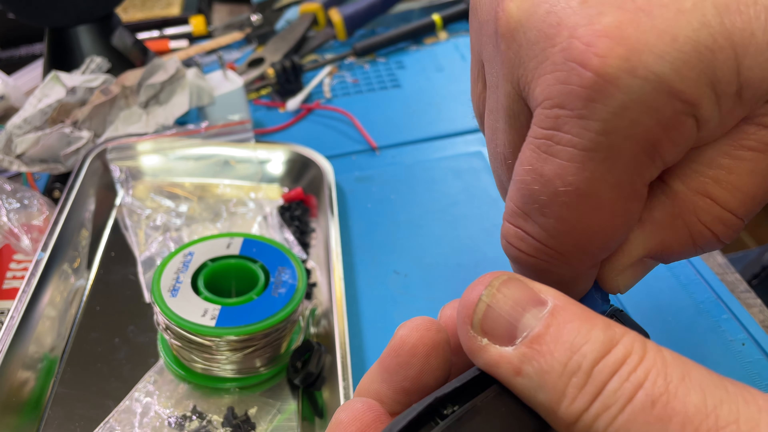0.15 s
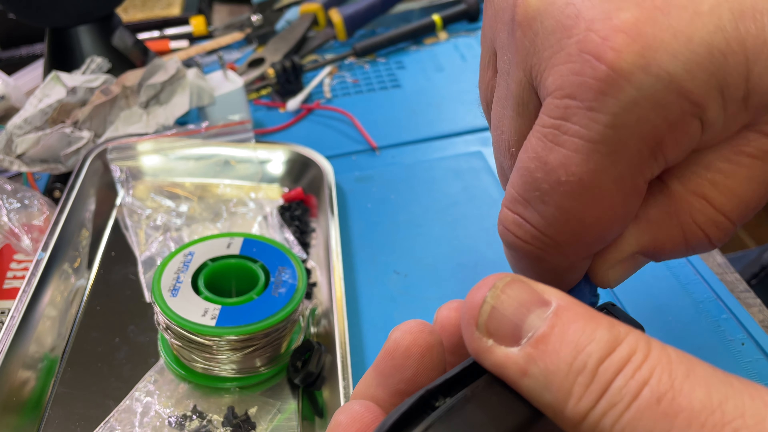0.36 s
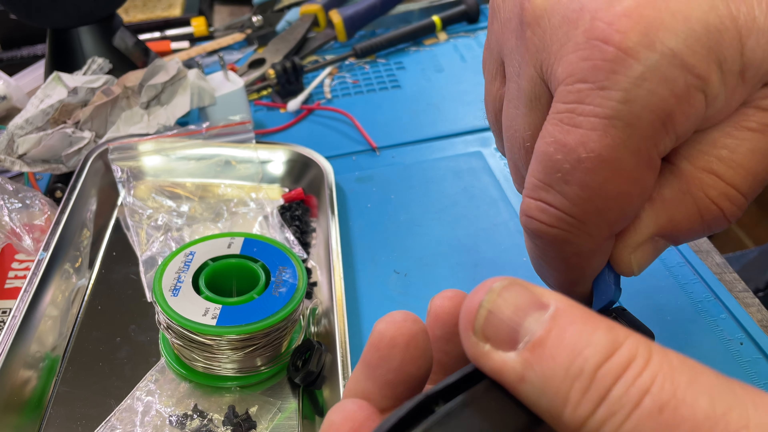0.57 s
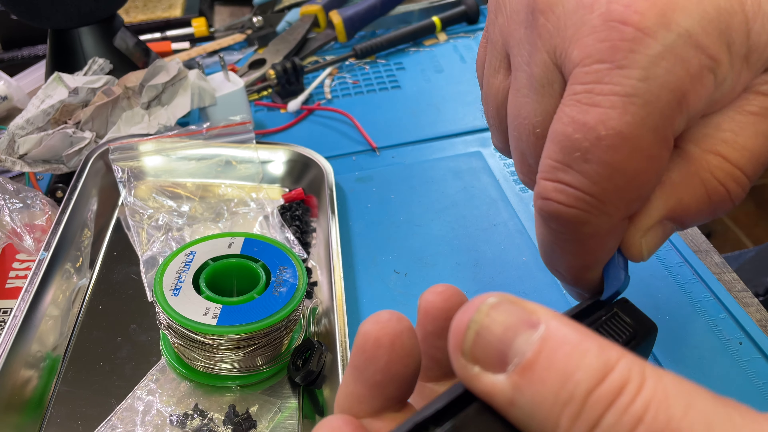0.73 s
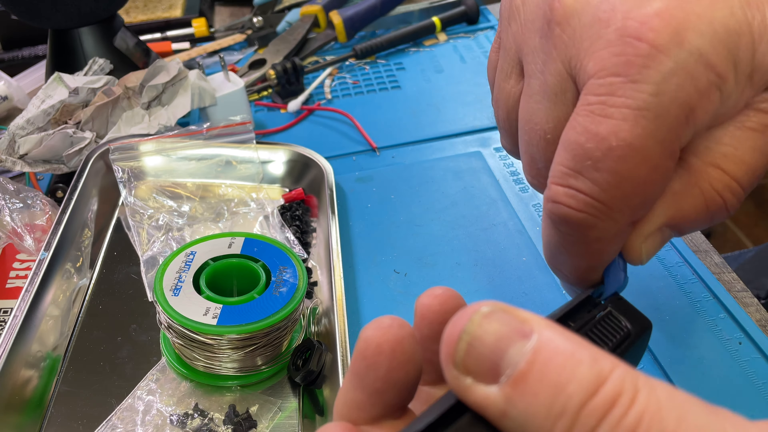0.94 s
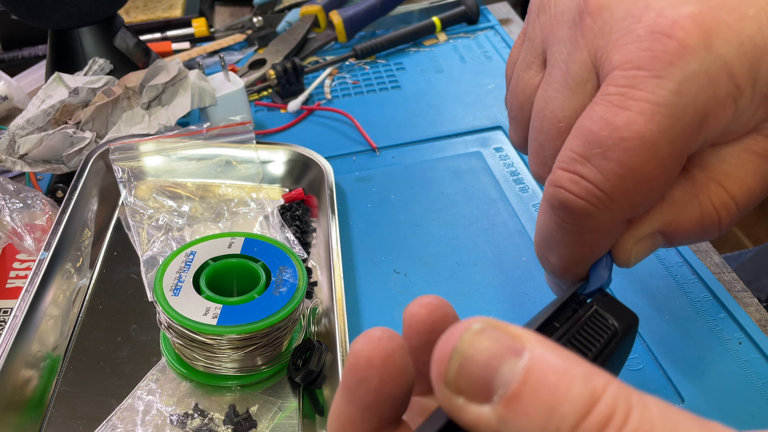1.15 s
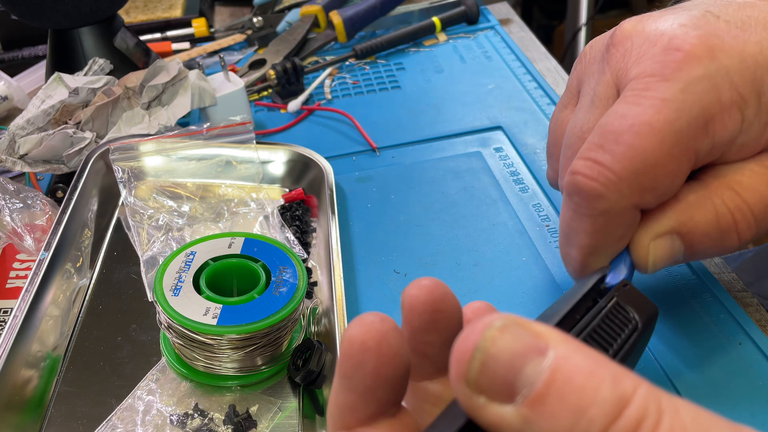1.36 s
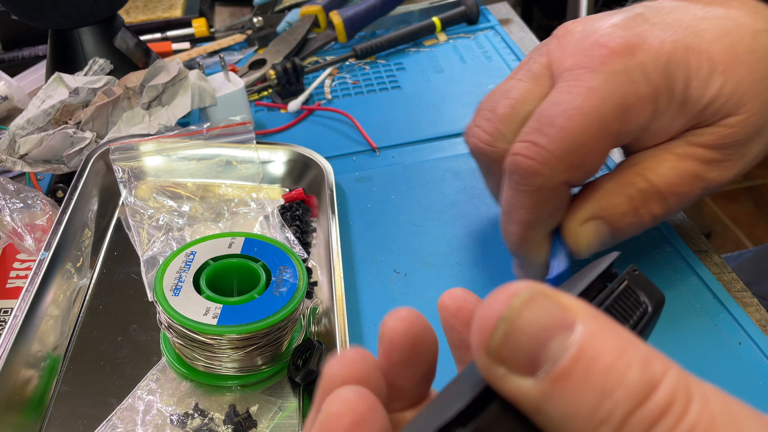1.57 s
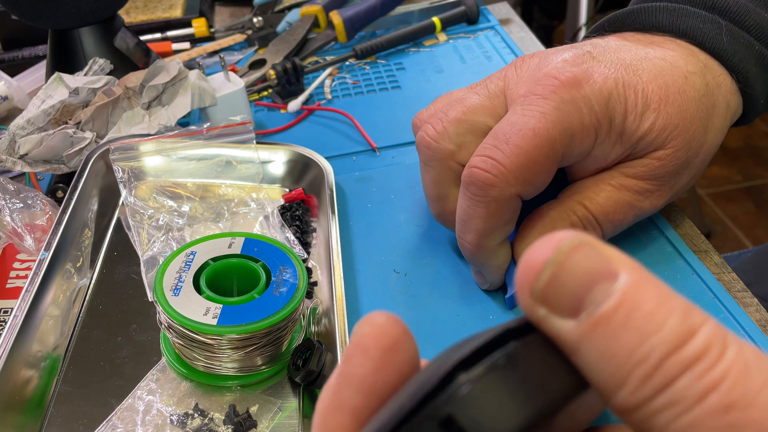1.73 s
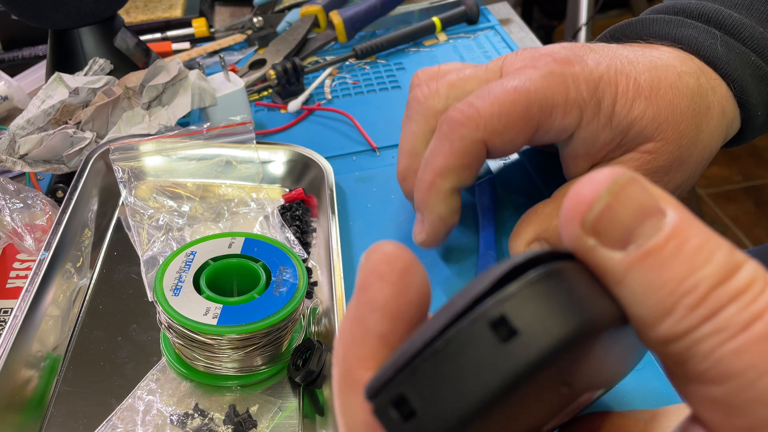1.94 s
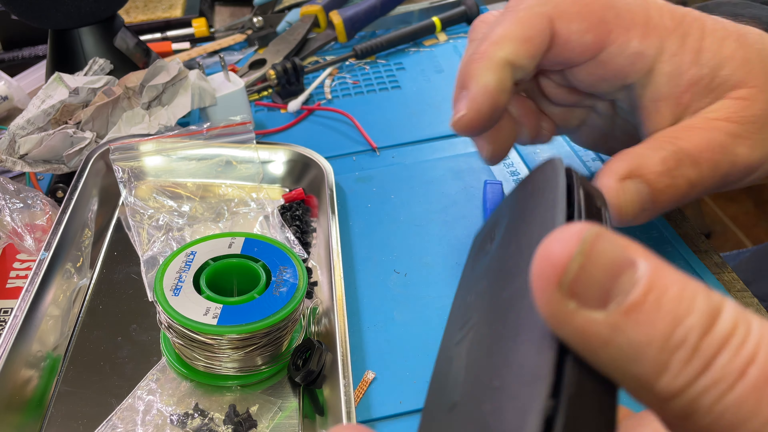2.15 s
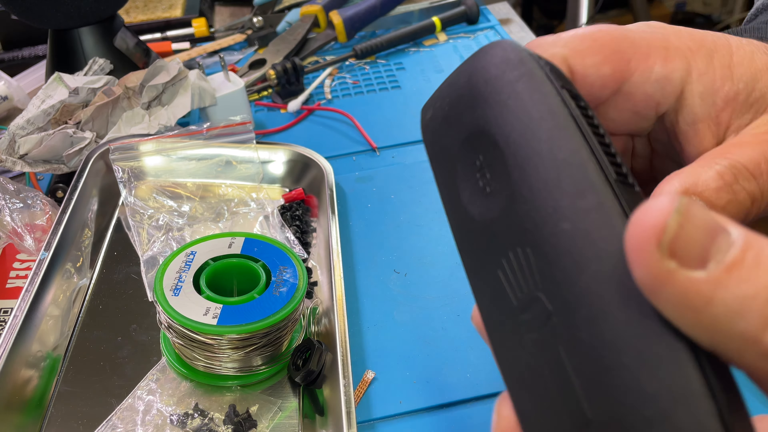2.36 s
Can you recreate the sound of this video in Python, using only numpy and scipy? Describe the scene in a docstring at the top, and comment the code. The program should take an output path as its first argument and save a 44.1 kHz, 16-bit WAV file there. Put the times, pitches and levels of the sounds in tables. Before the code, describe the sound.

Prying open a plastic case: one sharp snap, smaller clicks and scrapes, then dull handling knocks

```python
"""A low handling rumble over faint hiss comes first, then a soft scrape and one loud snap as a clip lets go.
Place: a workbench, a flashlight case opened with a plastic pry tool, close to a two-port microphone.
The tool scrapes, clicks and squeaks along the seam, the freed case knocks dully, and fingers rub over it.
Blows ring damped modes, friction is coloured noise gated by stick-slip, and faint hollow tones are
wavering sines; snap, clicks, cracks and knocks also get short reflections from bench and room."""
import sys
import numpy as np
from scipy import signal
from scipy.fft import rfft, irfft
from scipy.io import wavfile

SR = 44100
rng = np.random.default_rng(int(sys.argv[2]) if len(sys.argv) > 2 else 0)


def wav_record(signal):
    """Record a signal, one row per channel, as 16-bit PCM in the file named by sys.argv[1]."""
    frames = np.transpose(np.atleast_2d(signal))
    bounded = np.clip(frames, -1, 1)
    # unit amplitude maps onto the largest positive 16-bit level
    quanta = np.round(bounded * 32767).astype(np.int16)
    wavfile.write(sys.argv[1], SR, quanta)


N = 105840  # samples, 2.4 s
TREBLE_HZ = 3020  # where friction is split into mids and treble


def amp(db):
    """Decibels to gain."""
    return 10 ** (np.asarray(db) / 20)


def evened(x):
    """Scales to rms 1."""
    return x / np.sqrt(np.mean(x ** 2) + 1e-20)


def read(points, hz):
    """Reads a table on a log-frequency axis."""
    f, value = np.transpose(points)
    return np.interp(np.log(hz + 1), np.log(f + 1), value)


def seconds(count=N):
    """Time axis."""
    return np.arange(count) / SR


def add(mix, s, sound):
    """Mixes a sound in at a time."""
    part = mix[round(s * SR):][:len(sound)]
    part += sound[:len(part)]


def bump(t, s, half_s):
    """Smooth swell and fade around a peak time."""
    return np.exp(-((t - s) / half_s) ** 2)


def colour(x, points, size=8192):
    """Causal minimum-phase filter of unit energy with the given spectrum."""
    hz = abs(np.fft.fftfreq(size, 1 / SR))
    log_gain = np.log(amp(read(points, hz)))
    response = np.exp(np.conj(signal.hilbert(log_gain)))
    taps = np.fft.ifft(response).real[:size // 2]
    return signal.fftconvolve(x, taps / np.linalg.norm(taps))[:N]


def split(x, hz):
    """Parts below and above a frequency."""
    low = irfft(rfft(x) / (1 + (np.fft.rfftfreq(N, 1 / SR) / hz) ** 4), N)
    return low, x - low


def drift(hz):
    """Random motion of rms 1, mostly slower than the given rate."""
    return evened(split(rng.standard_normal(N), hz)[0])


def ring(modes, wave=np.cos):
    """Sum of dying sinusoids, each falling 60 dB in its t60."""
    t = seconds(count=16000)
    return sum(amp(db - 60 * t / t60) * wave(2 * np.pi * hz * t) for hz, db, t60 in modes)


LOW_CUT_HZ = 52


def strike(rows, body, lag_s):
    """Each blow is a short push, longer for a soft contact, that rings the body; its bass arrives late."""
    pushes, t = np.zeros(N), seconds(count=600)
    for s, db, soft_hz in rows:
        push = t * np.exp(-2 * np.pi * soft_hz * t)
        add(pushes, s, amp(db) * push / push.sum())
    hz = np.fft.rfftfreq(N, 1 / SR) + 1
    # bending waves are slow at low pitch: the delay equals lag_s at 100 Hz
    delay = 2 * lag_s / (1 + (hz / 100) ** 2)
    lag = np.exp(-2j * np.pi * np.cumsum(delay) * SR / N)
    low_cut = 1 / np.sqrt(1 + (LOW_CUT_HZ / hz) ** 8)
    struck = signal.fftconvolve(pushes, body)[:N]
    return irfft(rfft(struck) * lag * low_cut, N)


# phase by which the left microphone port leads: (frequency [Hz], lead [rad])
PORT_LEAD = [(230, 0), (900, 1.0), (2200, 1.35), (5200, .3), (9000, -3.6), (12500, -6.1), (16000, -6.3)]
# level of the left port over the right: (frequency [Hz], level difference [dB])
PORT_LEAN = [(100, 2.5), (200, 4), (700, -1), (1500, 7.5), (2200, 1), (2900, 10), (4000, 7), (7000, 1.5),
             (15000, -2)]


def ports(x, width=1):
    """Two microphone ports hear a close source with different phase and level, scaled by the width."""
    hz = np.fft.rfftfreq(N, 1 / SR)
    phase = np.exp(.5j * width * read(PORT_LEAD, hz))
    half = (amp(read(PORT_LEAN, hz) / 2) ** width) * phase
    return irfft(rfft(x) * np.array([half, 1 / half]), N)


# dying away of the reflections: (frequency [Hz], t60 [s])
ROOM_DECAY = [(100, .2), (400, .17), (1400, 0.091), (4000, 0.11), (14000, 0.057)]
ROOM_DELAY_S = .003


def room(x, count=12000, size=10):
    """Sparse reflections from the bench and the room, dying band by band; the bass is alike in both ports."""
    taps = rng.choice([-1., 1.], (2, count)) * (rng.random((2, count)) < 1 / size)
    hz, t, z = signal.stft(taps, SR, nperseg=256)
    z[1, hz < 250] = z[0, hz < 250]
    fade = amp(-60 * t / read(ROOM_DECAY, hz)[:, None])
    tail = signal.istft(z * fade, SR, nperseg=256)[1]
    tail = np.pad(tail, ((0, 0), (round(ROOM_DELAY_S * SR), 0)))
    return signal.fftconvolve(x[None], tail / np.linalg.norm(tail[0]), axes=1)[:, :N]


SLIPS_PER_S, SLIP_SPREAD_DB = 6800, 0.5
FRICTION_WIDTH, FRICTION_SPREAD = 1, .6  # port width; gain of the part that differs between ports


def friction(spectrum):
    """Dense tiny slips of uneven size, coloured by the surface."""
    size = amp(SLIP_SPREAD_DB * rng.standard_normal((3, N)).clip(-2, 2))
    happens = rng.random((3, N)) < SLIPS_PER_S / SR
    slips = rng.standard_normal((3, N)) * size * happens
    near, left, right = [evened(colour(s, spectrum)) for s in slips]
    return evened(ports(near, FRICTION_WIDTH) + FRICTION_SPREAD * np.array([left, right]))


# spectrum of the room hiss: (frequency [Hz], relative level [dB])
HISS_SPECTRUM = [(180, -32), (378, -1), (643, -14.5), (5030, -27), (8700, -40.5), (14100, -23.5),
                 (15800, -46.5)]
HISS_DB = -79.5


def room_hiss():
    """Faint steady noise, independent in the two ports."""
    return amp(HISS_DB) * np.array([colour(n, HISS_SPECTRUM) for n in rng.standard_normal((2, N))])


# low rumble of handling over time: (time [s], level [dB])
RUMBLE_LEVELS = [(0, -65.5), (.07, -73), (.2, -56.5), (.45, -68.5), (.55, -64.5), (.65, -72), (.82, -63.5),
                 (.95, -74.5), (1.25, -60), (1.45, -71.5), (1.79, -56.5), (1.88, -64.5), (2.2, -59.5),
                 (2.4, -68.5)]
# its spectrum: (frequency [Hz], relative level [dB])
RUMBLE_SPECTRUM = [(20, -22.5), (70, 3), (115, -4), (230, -5.5), (340, -13.5), (520, -23.5), (2000, -43.5)]
# fingers sliding on the plastic: (time [s], level of the mids [dB], level of the treble [dB])
RUB_LEVELS = [(0, -105, -91.5), (.3, -81.5, -75), (.65, -75, -83.5), (.95, -93, -88.5),
              (1.198, -70.5, -76.5), (1.42, -76.5, -73), (1.58, -75.5, -77), (1.979, -76.5, -69.5),
              (2.046, -62, -56), (2.13, -66.5, -65), (2.208, -57.5, -62), (2.299, -65.5, -71.5),
              (2.4, -71.5, -70)]
# spectrum of skin on plastic: (frequency [Hz], relative level [dB])
SKIN_SPECTRUM = [(470, -31), (980, -17), (1390, 1), (1800, -5), (2230, -3.5), (2600, -14), (7000, -23.5),
                 (8700, -35), (10900, -18.5), (15800, -23.5)]


def hands():
    """Skin hisses over the plastic while the grip rumbles."""
    t, (low, high) = seconds(), split(friction(SKIN_SPECTRUM), TREBLE_HZ)
    s, mids_db, treble_db = np.transpose(RUB_LEVELS)
    mids = amp(np.interp(t, s, mids_db)) * evened(low)
    treble = amp(np.interp(t, s, treble_db)) * evened(high)
    rumble = evened(ports(colour(rng.standard_normal(N), RUMBLE_SPECTRUM)))
    rumble_db = np.interp(t, *np.transpose(RUMBLE_LEVELS))
    return mids + treble + amp(rumble_db) * rumble


CHATTER_HZ, CHATTER_JITTER = 170, .4  # typical slip rate; its unevenness (rms of the log rate)
CHATTER_DB, CHATTER_SPREAD_DB = 7, 1.5  # fade within a slip; spread of strength between slips


def chatter():
    """The blade sticks and lets go unevenly; each slip starts sharply, with its own strength, and fades."""
    rate_hz = CHATTER_HZ * np.exp(CHATTER_JITTER * drift(CHATTER_HZ))
    turns = np.cumsum(rate_hz) / SR
    strength_db = CHATTER_SPREAD_DB * rng.standard_normal(N)[turns.astype(int)]
    return evened(amp(strength_db - CHATTER_DB * (turns % 1)))


# strokes of the tool: (time of peak [s], rise [s], fall [s], level [dB], treble gain [dB], body gain [dB])
TOOL_STROKES = [(.135, .035, .04, -62, -27, -17), (0.226, 0.0093, 0.024, -43.5, 6.5, 10),
                (.266, .034, .02, -49, 1.5, -2), (.404, 0.033, 0.037, -57, 1, -1.5),
                (.518, 0.03, 0.024, -55.5, -1, 1), (.703, .008, .017, -60.5, 4, -4.5),
                (0.79, 0.0038, 0.032, -53.5, 0.5, -3), (.842, 0.024, 0.022, -54, 5, 1),
                (1.181, 0.039, .03, -59, 7, 6), (1.21, 0.0081, 0.015, -42, 7, 2.5),
                (1.235, 0.012, 0.025, -49.5, 0, 0.5), (1.332, 0.016, 0.018, -50, 5.5, -24),
                (1.344, 0.0024, 0.0047, -41.5, -0.5, -1), (1.362, 0.0099, 0.027, -49.5, 0.5, 8),
                (1.452, 0.0088, 0.017, -55.5, -0.5, -12), (1.497, .021, 0.016, -48, 2.5, 1),
                (1.636, 0.0063, 0.027, -56.5, 8, -6), (1.843, .012, 0.056, -72.5, 21, 2)]
# spectrum of the scrape before its pitch is shifted: (frequency [Hz], relative level [dB])
SCRAPE_SPECTRUM = [(240, -25), (400, -12), (570, -9), (800, -11.5), (1050, -14), (1300, -0.5), (1500, 2),
                   (1920, -6), (2240, 0.5), (2800, -10.5), (3500, -12), (4100, -18.5), (5800, -26.5),
                   (7200, -22.5), (8600, -34), (10900, -23.5), (14000, -25.5), (15800, -29.5)]
# pitch of the scraped plastic, which dips and then climbs as the seam opens: (time [s], pitch factor [1])
SEAM_PITCH = [(.15, 0.94), (.26, 0.84), (.85, 0.96), (1.2, 1.02), (1.5, 1.044)]
BODY_HZ = 900  # body lies below, mids above
WANDER, WANDER_HZ = .03, 18  # rms of the pitch factor's wander; its top rate


def scrapes():
    """Strokes swell and fade as the blade chatters; resonances wander with the contact point."""
    t, (low, high) = seconds(), split(friction(SCRAPE_SPECTRUM), TREBLE_HZ)
    # reading the noise faster or slower shifts its pitch; the treble is left alone
    speed = np.interp(t, *np.transpose(SEAM_PITCH)) + WANDER * drift(WANDER_HZ)
    place = np.cumsum(speed) % N
    shifted = np.array([np.interp(place, np.arange(N), side) for side in low])
    body, mids = split(shifted, BODY_HZ)
    out = 0
    for s, rise_s, fall_s, db, treble_db, body_db in TOOL_STROKES:
        swell = bump(t, s, np.where(t < s, rise_s, fall_s))
        out = out + amp(db) * swell * (amp(body_db) * body + mids + amp(treble_db) * high)
    return out * chatter()


# bright cracks of plastic edges: (time [s], level [dB], decay to 1/e [s])
EDGE_CRACKS = [(.219, -16.5, 0.0029), (1.205, -57, 0.0093), (1.7475, -54, 0.0036), (1.8141, -45, 0.0028)]
# their spectrum: (frequency [Hz], relative level [dB])
CRACK_SPECTRUM = [(500, -31), (2000, 3), (4000, -5), (7000, 1), (9200, -4.5), (10800, 4), (12300, -2),
                  (13500, -0.5), (16000, -7)]
CRACK_ROOM_DB = -11


def cracks():
    """An edge skids over another in a few milliseconds of bright noise."""
    x, t = np.zeros(N), seconds(count=3000)
    for s, db, decay_s in EDGE_CRACKS:
        add(x, s, amp(db) * np.exp(-t / decay_s) * rng.standard_normal(len(t)))
    x = colour(x, CRACK_SPECTRUM)
    return ports(x) + amp(CRACK_ROOM_DB) * room(x)


SNAP_BLOWS = [(.2198, -4, 4420), (.2220, -13, 4500), (.2229, -10, 3500), (.2610, -31, 1620),
              (.2705, -25, 1300)]
# small catches of the tool in the seam: (time [s], level [dB], contact softness [Hz])
SEAM_CLICKS = [(0.503, -45.5, 3516), (.531, -47.5, 3500), (.703, -45, 2940), (.788, -48.5, 3000),
               (1.04, -55.5, 3037), (1.207, -29, 3500), (1.2093, -30, 4000), (1.22, -31, 3500),
               (1.2317, -49, 3020), (1.3437, -47, 3560), (1.3626, -40, 1690), (1.4529, -43.5, 4150),
               (1.4955, -47, 2960)]
# ring of the housing; the shortest mode is the stiff spot under the blow: (frequency [Hz], level [dB], t60 [s])
CASE_MODES = [(560, -33, 0.0088), (930, -36, 0.043), (1250, -19.5, 0.015), (1324, -16.5, 0.026),
              (1440, -11, 0.023), (1610, -21.5, .03), (1860, -4, 0.0015), (1742, -20.5, 0.074),
              (2240, -24.5, .05), (2190, -15.5, 0.02), (2585, -29.5, 0.051), (3050, -24.5, .05),
              (3330, -25, 0.012), (3820, -29.5, 0.046), (5630, -31.5, 0.031)]
# jolts of the whole case in the hand: (time [s], level [dB], contact softness [Hz])
CASE_JOLTS = [(.2205, 6.5, 193), (.712, -12, 42), (1.208, -21, 420)]
# low sway of the jolted case: (frequency [Hz], level [dB], t60 [s])
SWAY_MODES = [(82.6, -26.5, 0.034), (168, -21.5, 0.042), (219, -30, .05)]
SWAY_LAG_S, CLIP_ROOM_DB = .014, -15


def clips():
    """The snap and the small catches ring the same housing; jolts of the whole case add low thumps."""
    x = strike(SNAP_BLOWS + SEAM_CLICKS, ring(CASE_MODES), 0)
    thumps = strike(CASE_JOLTS, ring(SWAY_MODES), SWAY_LAG_S)
    return ports(x + thumps) + amp(CLIP_ROOM_DB) * room(x)


# faint hollow tones of the handling: (time of peak [s], half length [s], pitch at peak [Hz], level [dB])
HOLLOW_TONES = [(.535, 0.038, 243.8, -59), (.83, 0.059, 316.6, -64.5), (1.32, 0.055, 254.2, -60),
                (1.63, .09, 257, -65.5)]
SAG_HZ_PER_S, WAVER_HZ = 110, 11.6  # fall of pitch; rms of its waver


def hollow():
    """Faint hollow tones swell, waver and sag as the grip changes."""
    t, x = seconds(), 0
    for s, half_s, hz, db in HOLLOW_TONES:
        pitch = hz - SAG_HZ_PER_S * (t - s) + WAVER_HZ * drift(CHATTER_HZ)
        tone = np.sin(2 * np.pi * np.cumsum(pitch) / SR)
        x = x + amp(db) * bump(t, s, half_s) * tone
    return ports(x)


# squeaks where the blade sticks and slips evenly: (time [s], half length [s], pitch [Hz], level [dB])
BLADE_SQUEAKS = [(1.4992, 0.0085, 2208, -46.5), (1.816, .0018, 2660, -53)]


def squeaks():
    """Even stick-slip of the blade on smooth plastic gives short pure whistles."""
    t, x = seconds(), 0
    for s, half_s, hz, db in BLADE_SQUEAKS:
        x = x + amp(db) * bump(t, s, half_s) * np.sin(2 * np.pi * hz * (t - s))
    return ports(x)


# dull knocks of hand and tool: (time [s], level [dB], contact softness [Hz], grip as a pitch factor [1])
CASE_KNOCKS = [(1.748, -16, 1960, 1.007), (1.7749, -26.5, 1120, 0.98), (1.851, -22.5, 413, 0.98),
               (1.959, -33.5, 490, 0.99), (2.0347, -24, 437, 1.09), (2.147, -29, 372, 1),
               (2.268, -33.5, 300, 1.25)]
# ring of the case damped by the hand, at grip 1: (frequency [Hz], level [dB], t60 [s])
HELD_MODES = [(173.4, -27.5, 0.089), (302, -24.5, 0.024), (600, -14.5, .02), (974, -15.5, 0.013),
              (1455, -8.5, 0.017), (1950, -11, 0.0087), (2560, -17.5, 0.019), (3350, -14, 0.011),
              (4950, -9.5, 0.0099)]
KNOCK_WIDTH, KNOCK_LAG_S, KNOCK_ROOM_DB = 0.81, 0.017, -13


def knocks():
    """Soft blows on the hand-damped case; a tighter grip makes the ring higher and shorter."""
    x = 0
    for s, db, soft_hz, grip in CASE_KNOCKS:
        modes = [(hz * grip, mode_db, t60 / grip ** 2) for hz, mode_db, t60 in HELD_MODES]
        x = x + strike([(s, db, soft_hz)], ring(modes, np.sin), KNOCK_LAG_S)
    return ports(x, KNOCK_WIDTH) + amp(KNOCK_ROOM_DB) * room(x)


def scene():
    """All sources over a faint room hiss."""
    tool = scrapes() + cracks() + clips() + squeaks()
    return room_hiss() + hands() + tool + hollow() + knocks()


EDGE_HZ = 16100


def record(dry):
    """The recorder's band limit: a steep low-pass."""
    taps = signal.firwin(255, EDGE_HZ, window=("kaiser", 9), fs=SR)
    return signal.oaconvolve(dry, taps[None], "same")


dry = scene()
out = record(dry)
wav_record(out)
```